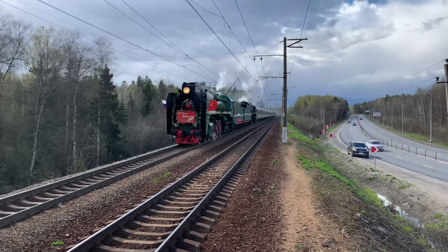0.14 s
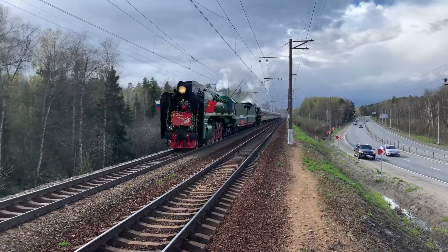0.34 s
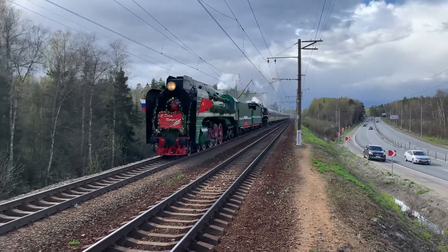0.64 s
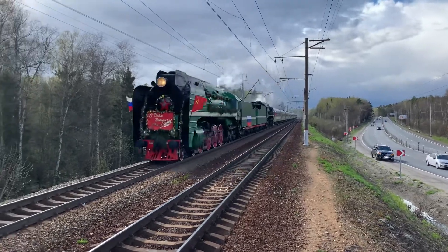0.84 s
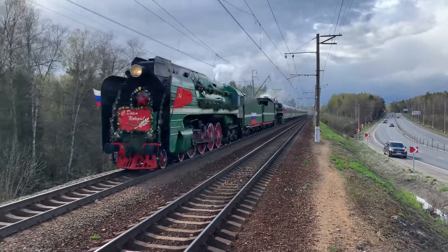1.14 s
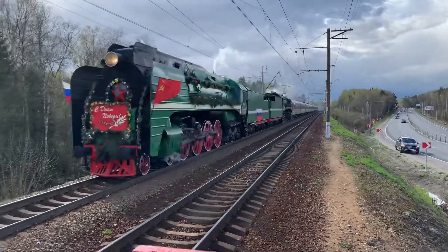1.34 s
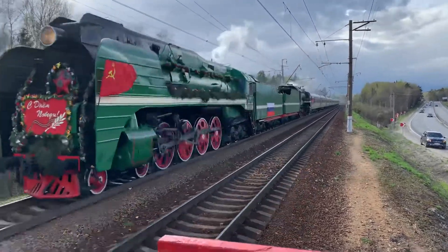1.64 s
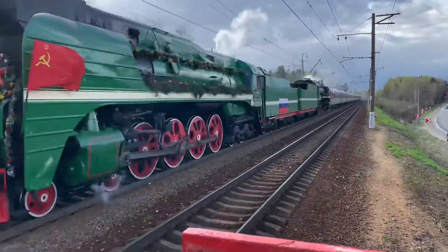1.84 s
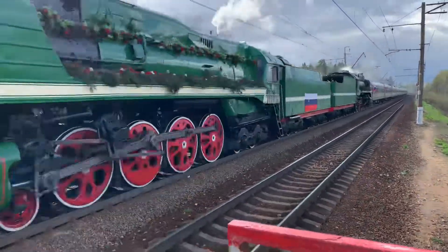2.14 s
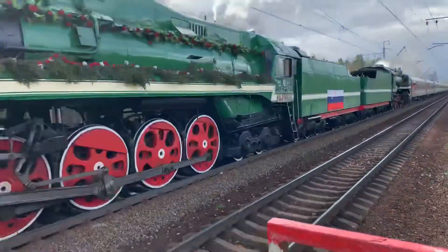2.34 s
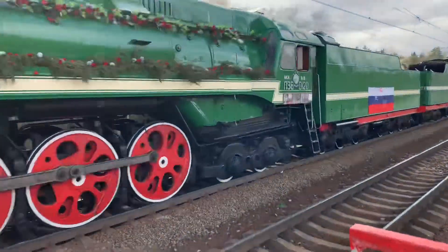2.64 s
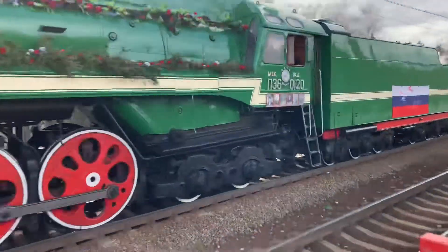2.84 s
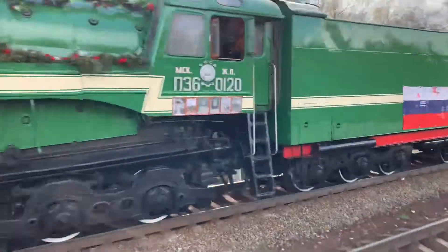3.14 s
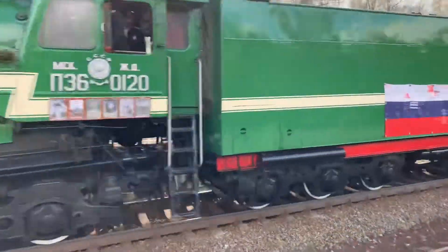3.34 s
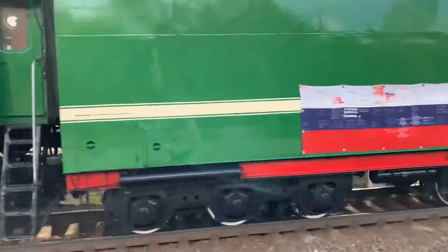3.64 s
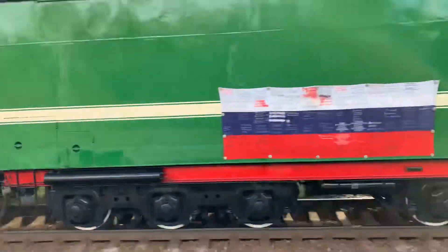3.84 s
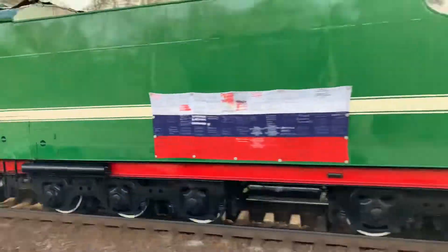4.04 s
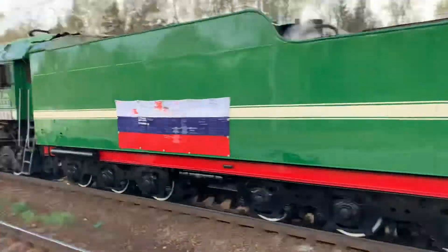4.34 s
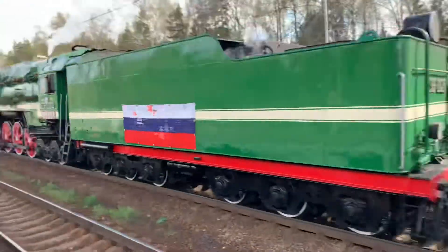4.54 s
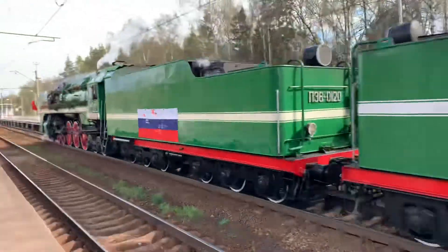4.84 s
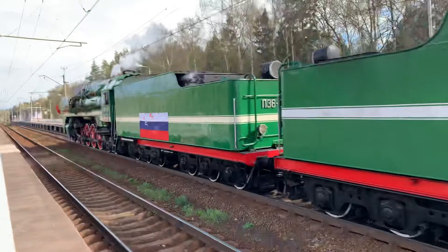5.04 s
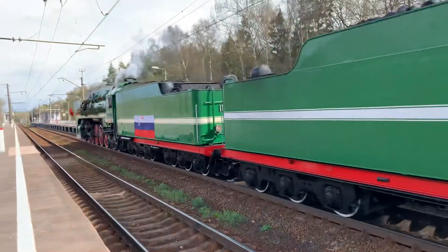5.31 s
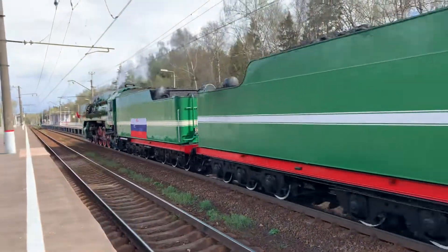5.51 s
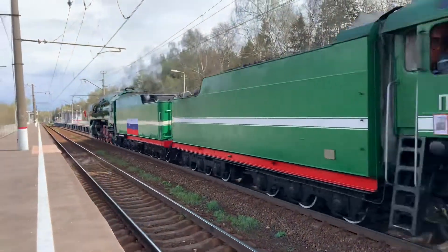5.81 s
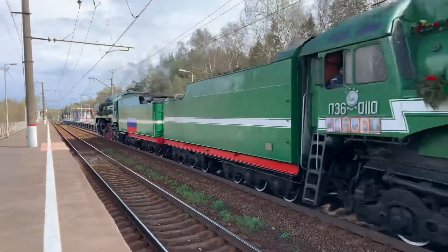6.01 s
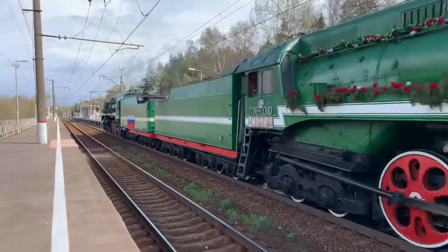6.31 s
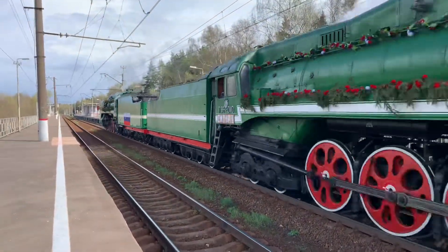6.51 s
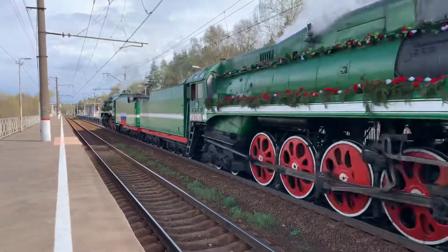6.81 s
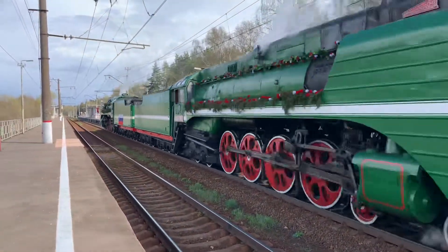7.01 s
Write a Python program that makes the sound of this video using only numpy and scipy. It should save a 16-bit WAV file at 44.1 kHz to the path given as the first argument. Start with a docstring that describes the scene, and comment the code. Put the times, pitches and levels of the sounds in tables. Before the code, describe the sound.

Two coupled steam locomotives pass at speed, close to a stereo microphone on a station platform. The rails sing faintly as a bright, sputtering steam hiss grows and sweeps to the side. The first engine goes by with roaring wheels, ragged rod clatter, dull thuds and a deep rumble. Another steam outlet gushes briefly, then the second engine follows with a softer rush as the hiss fades.

```python
"""Two steam locomotives passing a platform

Two coupled engines roll by at speed, close to a stereo microphone. A steam jet hisses from the first,
sweeping across the two ports, and the trees throw it back; a second outlet gushes by the tender, and
the next engine follows with a softer rush. Underneath, wheels roar on the rails group by group,
the running gear clatters and thuds, and the heavy frames rumble."""
import sys
import numpy as np
from scipy import signal
from scipy.fft import rfft, irfft
from scipy.io import wavfile
from scipy.ndimage import uniform_filter1d

SR = 44100
rng = np.random.default_rng(int(sys.argv[2]) if len(sys.argv) > 2 else 0)


def bounce(signal):
    """Save signal as a 16-bit WAV file at the path given by the first command-line argument."""
    frames = np.transpose(np.atleast_2d(signal))
    limited = np.clip(frames, -1, 1)
    pcm = np.round(limited * 32767).astype(np.int16)
    wavfile.write(sys.argv[1], SR, pcm)


N = 315932
T = np.arange(N) / SR
HZ = np.fft.rfftfreq(1024, 1 / SR)
FRAME_T = np.arange(N // 256 + 5) * 256 / SR
TRAIN_M_PER_S, SOUND_M_PER_S, TRACK_DISTANCE_M = 18, 343, 6.9

# The jet swells, holds alongside, sinks behind the tender. Each row: time in seconds, relative dB.
JET_LEVEL = [(0, -39), (0.2, -38.5), (0.32, -34), (0.7, -32.5), (0.9, -31.5), (1.7, -27), (2.2, -25),
             (3.05, -29), (4.2, -26), (4.32, -30.5), (5.15, -27.5), (5.75, -35.5), (6.1, -36),
             (7.16, -45.5)]
# The jet's direction. Each row: time in seconds, lead of the left port in ms.
JET_LEAD = [(0.0, 0.051), (0.7, 0.081), (1.2, 0.091), (1.65, 0.14), (1.85, 0.21), (2.1, 0.22), (2.35, 0.29),
            (2.6, 0.39), (3.2, 0.4), (3.8, 0.39), (4.1, 0.3), (4.4, 0.23), (4.75, 0.15), (5.4, 0.12),
            (7.1, 0.093)]
# How alike the ports hear steam, and wheels. Each row: frequency in Hz, likeness from 0 to 1.
JET_LIKENESS = [(1500, .82), (2600, .96), (6000, .92), (8500, .85), (10300, .8), (13000, .88)]
WHEEL_LIKENESS = [(100, 0.96), (380, 1), (550, 0.4), (900, 0.54), (2000, 1)]


def steam_jet(level_db=2.0, patchy_db=1.27, streak_db=2.06, flutter_db=0.75):
    """A turbulent jet: its roar and fizz shift as it turns past, and it sputters."""
    # The hiss's colour. Each row: frequency in Hz, relative level in dB.
    hiss_colour = [(700, -19), (1450, -8), (1750, -3), (2150, -1.5), (3000, .3), (4400, 2.7), (5200, .4),
                   (6100, 2), (7300, -3.2), (8300, -1.6), (10500, -4.6), (13000, -4.2), (14500, -8.5)]
    # The roar around 2 kHz, and the treble. Each row: time in seconds, lift in dB before band weighting.
    roar_ride = [(0, 4.5), (1.6, 2.5), (2.15, -2.5), (3.65, 3.5), (4.6, -2), (5.6, 5.5), (6.5, 1),
                 (7.16, 15.5)]
    treble_ride = [(0, -2.5), (0.8, -2), (1.7, 1), (1.82, 2), (1.95, 0.3), (3, 0.3), (4.3, -1.2), (5, -0.3),
                   (6.1, -1), (7.16, -5)]
    # Spurts of steam. Each row: centre in seconds, lift in dB, half length in seconds, extra roar in dB.
    spurts = [(0.95, 2.5, 0.19, -4.5), (1.39, 2, 0.021, -2), (1.566, 4.5, 0.0059, -8),
              (1.83, 3.5, 0.055, -2), (2.495, 3, 0.016, -2.5), (2.538, 6, 0.0079, -4),
              (2.602, 3, 0.025, -3), (2.915, 4.5, 0.011, 1), (3.288, 3.5, 0.018, 5.5),
              (3.477, 1, 0.052, 4.5), (3.747, 3.5, 0.041, 1), (3.895, 5.5, 0.036, -8),
              (4.016, 1.5, 0.0076, 11), (4.086, 7, 0.013, 4.5), (4.54, 0.5, .03, 4),
              (4.845, 4.5, 0.042, -2), (4.986, 0, 0.023, 5), (5.07, 0, 0.049, 2), (5.79, 5, 0.14, 3.5),
              (6.5, 6, 0.03, 0)]
    # The hiss dips briefly. Each row: centre in seconds, gain in dB, half length in seconds.
    dips = [(0.65, -1.5, .025), (1.32, -3, 0.023), (2.566, -5, 0.013), (3.633, -5.5, 0.012),
            (4.647, -3, 0.047)]
    roar_db = curve(roar_ride, FRAME_T)
    roar_db += sum(db * swell(FRAME_T, s, length) for s, _, length, db in spurts)
    roar = roar_db[:, None] * spectrum([(1500, 1.0), (3200, 0.47), (5200, 0)])
    fizz = curve(treble_ride, FRAME_T)[:, None] * spectrum([(6500, 0.028), (9500, 1.2), (13000, 4.2)])
    eddies = patchy_db * patches(size=(5, 24)) + streak_db * patches(size=(22, 4))
    jet = noise(spectrum(hiss_colour) + roar + fizz + eddies, JET_LIKENESS, jet_phase(), jet_focus())
    spurts_db = sum(db * swell(T, s, length) for s, db, length, _ in spurts)
    dips_db = sum(db * swell(T, s, length) for s, db, length in dips)
    sputter_db = flutter_db * flutter(slow_hz=7, fast_hz=160)
    return jet * gain_of(level_db + curve(JET_LEVEL, T) + spurts_db + dips_db + sputter_db)


def jet_phase(wander_ms=0.013, centred_above_hz=10100):
    """The jet's phase between the ports: its direction wavers, and ballast scatter roughens the sweep."""
    # The ports' own phase, and what sound from the side adds.
    # Each row: frequency in Hz, lead of the left in radians.
    port_phase = [(1500.0, -1.0), (2200.0, -0.52), (3000.0, -0.27), (4300.0, 1.52), (5100.0, 0.73),
                  (5800.0, 2), (6500.0, 4), (7200.0, 5.5), (8000.0, 6.1), (9000.0, 7.5), (10400.0, 10),
                  (11000.0, 15.5)]
    side_phase = [(1700.0, 0.93), (2600.0, 0.38), (3500.0, 0.55), (5000.0, 0.88), (5900.0, 1),
                  (6900.0, -1.7), (8000.0, 0.052), (10000.0, -2.2)]
    wander = wander_ms * np.interp(FRAME_T, T, flutter(slow_hz=3.7, fast_hz=40))
    scatter = 0.4 * patches(size=(30, 12))
    ports = spectrum(port_phase) + sideways(FRAME_T)[:, None] * spectrum(side_phase)
    sweep = arrival_phase(np.c_[FRAME_T, curve(JET_LEAD, FRAME_T) + wander])
    return (sweep + ports + scatter) * (HZ < centred_above_hz)


def jet_focus():
    """While its direction swings quickly the plume is wide, and the ports hear it less alike."""
    swing_ms_per_s = abs(uniform_filter1d(np.gradient(curve(JET_LEAD, FRAME_T), FRAME_T), size=60))
    return 1 - .35 * np.minimum(swing_ms_per_s[:, None] / .25, 1)


def sideways(t):
    """How far the jet is off to the side: zero straight along the track, one abreast."""
    return (curve(JET_LEAD, t) / max(ms for _, ms in JET_LEAD)) ** 2


def gush(level_db=-28.0, start_s=3.93, end_s=4.19, lead_ms=0.345):
    """A second, narrower steam outlet swings into view by the tender and is cut off again."""
    # The outlet's peaky colour. Each row: frequency in Hz, relative level in dB.
    colour = [(1200, -14), (2200, -7), (2900, 8), (3900, -12), (5000, -23), (6100, 8), (7200, -11),
              (9000, 2), (12000, -27)]
    envelope = bursts([(start_s, level_db, end_s - start_s)], rise_s=0.14, decay_s=0.055)
    return noise(spectrum(colour), JET_LIKENESS, arrival_phase([(0, lead_ms)])) * envelope


def second_steam(level_db=-36, abreast_s=6.47, patchy_db=3.3, flutter_db=-1.2):
    """The second locomotive brings a softer, broad rush of steam of its own."""
    # The rush's colour. Each row: frequency in Hz, relative level in dB.
    colour = [(900, -8), (1600, 1.5), (2900, 1), (4200, 3), (6000, -1.5), (8500, -6), (11000, -16),
              (14000, -17)]
    rush = noise(spectrum(colour) + patchy_db * patches(size=(5, 24)), JET_LIKENESS, jet_phase())
    sputter_db = flutter_db * flutter(slow_hz=7, fast_hz=160)
    return rush * nearness(abreast_s) * gain_of(level_db + sputter_db)


def wheels(rails_db=-41, ring_db=3.0, flutter_db=1.0):
    """Rolling noise: first the rails sing ahead of the train, then the wheels themselves take over."""
    # Singing rails, and wheels close by. Each row: frequency in Hz, relative level in dB.
    rail_colour = [(250, -16), (500, -5.5), (700, -4), (880, -2), (1080, 2), (1350, -7), (1900, -47),
                   (2250, -3), (2600, -17.5), (4000, 2), (8000, -16)]
    wheel_colour = [(250, -3), (470, -3.5), (570, -5), (670, -3), (820, -4), (1100, -3.5), (1450, -8),
                    (2000, -17.5), (3500, -18.5), (8000, -40)]
    # The wheels' direction. Each row: time in seconds, lead of the left port in ms.
    lead = [(0, 0.022), (2.4, 0.17), (3.7, 0.25), (4.4, -0.22), (7.1, -0.25)]
    # Drivers and bogies going by. Each row: time abreast in seconds, level in dB.
    groups = [(2.5, -29.5), (3.4, -33.5), (4.75, -36), (5.75, -42), (6.5, -37.5)]
    colour = blend(rail_colour, wheel_colour, start_s=1.1, end_s=2.3)
    roar = noise(colour + ring_db * patches(size=(30, 2)), WHEEL_LIKENESS, arrival_phase(lead))
    rails = gain_of(rails_db) * train_gain(arrive_s=0.77, steepness=2.9, ramp_s=4.3, db_per_s=2)
    power = rails ** 2 + sum((gain_of(db) * nearness(s)) ** 2 for s, db in groups)
    roughness_db = flutter_db * flutter(slow_hz=6, fast_hz=70)
    return roar * np.sqrt(power) * gain_of(roughness_db)


def rod_clatter(level_db=-4, rattle_db=1.0):
    """Loose rods and driving wheels rattle in short, ragged bursts."""
    # The bursts. Each row: start in seconds, relative level in dB, length in seconds.
    hits = [(1.447, -33.5, 0.029), (1.857, -27, 0.015), (2.273, -22.5, 0.03), (2.475, -33, 0.019),
            (2.7, -21, 0.039), (2.875, -23, 0.045), (3.152, -24.5, 0.029), (3.58, -32, 0.048),
            (4.365, -32, 0.009), (5.385, -37.5, 0.0089), (5.78, -35, 0.013), (6.06, -45, 0.011),
            (6.228, -30, 0.0075), (6.335, -37, 0.014), (6.65, -35.5, 0.023)]
    # The clatter's colour. Each row: frequency in Hz, relative level in dB.
    colour = [(60, -24.5), (130, -7), (300, 6.5), (700, 11.5), (950, 4.5), (1350, 6), (1750, -7),
              (4000, -14), (9000, -32)]
    rattle = gain_of(rattle_db * flutter(slow_hz=60, fast_hz=250))
    envelope = gain_of(level_db) * bursts(hits, rise_s=0.0015, decay_s=0.02)
    return noise(spectrum(colour), WHEEL_LIKENESS) * rattle * envelope


def thuds(level_db=1.0, rise_s=0.0032):
    """Heavy blows: after each, the track bed swings briefly and is still."""
    # Dull thuds. Each row: start in seconds, relative level in dB, pitch in Hz.
    blows = [(.018, -33, 188), (0.048, -32, 89), (0.079, -31, 208), (.097, -26.5, 110), (0.564, -28, 60.4),
             (2.266, -26, 127), (2.424, -21.5, 99.4), (2.453, -21, 150), (2.715, -16, 91),
             (2.863, -17.5, 95), (3.162, -18.5, 110), (3.232, -18, 70), (3.451, -18.5, 91),
             (3.84, -27.5, 84), (4.219, -19, 81), (4.546, -21.5, 70.4), (4.746, -20, 90),
             (5.229, -25, 93.5), (5.782, -18, 85), (6.077, -30, 129), (6.153, -23, 80), (6.23, -23, 95),
             (6.377, -19.5, 100), (6.534, -27, 120), (6.703, -33, 100), (6.837, -21.5, 101)]
    track_bed = np.zeros(N)
    for start_s, db, hz in blows:
        age = np.maximum(T - start_s, 0)
        envelope = age / rise_s * np.exp(1 - age / rise_s)
        track_bed += gain_of(level_db + db) * envelope * np.sin(2 * np.pi * hz * age)
    return track_bed


def rumble(deep_db=-32.0, far_db=-50.5, drone_db=-30.5, lead_ms=-0.22, ring_db=1.5, jolt_db=0.5):
    """The track bed shakes under the axles; frames and tenders drone above it; both jolt together."""
    # The track bed, then the drone coming and going by. Each row: frequency in Hz, relative level in dB.
    deep_colour = [(20, -32), (40, 1), (52, -4.5), (80, -2), (125, -3.5), (170, -13.5), (260, -14.5),
                   (600, -76)]
    drone_coming = [(70, -53), (150, 7.5), (200, 0), (270, 1.5), (350, -1.5), (420, -12.5), (490, -9.5),
                    (800, -20.5), (2500, -60)]
    drone_passing = [(70, -14), (150, -6.5), (205, -1.5), (250, -1.5), (305, -1), (375, 4.5), (440, -14),
                     (520, -10), (640, -20), (800, -36), (2500, -46)]
    phase = arrival_phase([(0, lead_ms)])
    deep = noise(spectrum(deep_colour), WHEEL_LIKENESS, phase)
    shaking = gain_of(deep_db) * train_gain(arrive_s=1.4, steepness=1.53, ramp_s=2.3, db_per_s=-1.1)
    deep *= np.hypot(gain_of(far_db), shaking)
    drone_colour = blend(drone_coming, drone_passing, start_s=1.8, end_s=2.96)
    drone = noise(drone_colour + ring_db * patches(size=(16, 2)), WHEEL_LIKENESS, phase)
    drone *= gain_of(drone_db) * train_gain(arrive_s=2.13, steepness=1.37, ramp_s=5.4, db_per_s=-5.0)
    return (deep + drone) * gain_of(jolt_db * flutter(slow_hz=8.7, fast_hz=30))


def wheel_ring(level_db=-39.0, rest_hz=1650, width_hz=110, abreast_s=3.43):
    """Rail roughness keeps one broad mode of a wheel disc sounding; its pitch drops as it goes by."""
    along_m = position_m(abreast_s, FRAME_T)
    receding_m_per_s = TRAIN_M_PER_S * along_m / np.hypot(along_m, TRACK_DISTANCE_M)
    doppler_hz = rest_hz / (1 + receding_m_per_s / SOUND_M_PER_S)
    detune = (HZ - doppler_hz[:, None]) / width_hz
    ring = noise(-20 * np.log10(1 + detune ** 2), JET_LIKENESS, jet_phase())
    return ring * gain_of(level_db) * nearness(abreast_s)


def steam_echo(level_db=-39, follow=0.95, delay_s=0.034):
    """Trees and platform throw back a diffuse wash of hiss that follows the jet late and loosely."""
    # The wash's colour. Each row: frequency in Hz, relative level in dB.
    colour = [(1000, -28), (2000, -4), (3200, 1), (4500, 16.5), (6200, 11), (8500, 4.5), (10500, 18),
              (13000, -34), (14800, -26)]
    # Its wide image. Each row: frequency in Hz, left-right likeness from 0 to 1.
    likeness = [(1000, .2), (12000, 0)]
    jet_db = curve(JET_LEVEL, T - delay_s)
    return noise(spectrum(colour), likeness) * gain_of(level_db + follow * (jet_db - jet_db.max()))


def sizzle(level_db=-59):
    """Small leaks all along the train keep up a faint, high fizz."""
    colour = spectrum([(6000, -30), (10000, -2), (13000, 0), (14800, -7)])
    return noise(colour, likeness=[(6000, .6)]) * gain_of(level_db)


def position_m(abreast_s, t):
    """How far along the track a part of the train is past the listener."""
    return TRAIN_M_PER_S * (t - abreast_s)


def nearness(abreast_s):
    """Amplitude of a passing point source, one when abreast."""
    return TRACK_DISTANCE_M / np.hypot(TRACK_DISTANCE_M, position_m(abreast_s, T))


def train_gain(arrive_s, steepness, ramp_s, db_per_s):
    """A long source grows with the angle that it fills; from ramp_s on it also ramps up or down."""
    filled = .5 + np.arctan(position_m(arrive_s, T) / TRACK_DISTANCE_M) / np.pi
    return filled ** (steepness / 2) * gain_of(db_per_s * np.maximum(T - ramp_s, 0))


def arrival_phase(lead):
    """Phase by which the left port leads, from (seconds, ms) rows: frames x bins."""
    return 2 * np.pi * HZ * curve(lead, FRAME_T)[:, None] / 1000


def noise(colour_db, likeness, phase=0, focus=1):
    """Stereo noise of rms one with a given colour, likeness and phase; a low focus widens it."""
    left_re, left_im, apart_re, apart_im = rng.standard_normal((4, len(FRAME_T), len(HZ)))
    left, apart = left_re + 1j * left_im, apart_re + 1j * apart_im
    same = np.clip(spectrum(likeness) * focus, 0, 1)
    right = (same * left + np.sqrt(1 - same ** 2) * apart) * np.exp(-1j * phase)
    frames = np.array([left, right]) * gain_of(colour_db)
    _, stereo = signal.istft(frames, nperseg=1024, noverlap=768, time_axis=1, freq_axis=2)
    return unit_rms(stereo[:, :N])


def flutter(slow_hz, fast_hz):
    """Turbulent wobble with equal power in each octave between two rates."""
    hz = np.fft.rfftfreq(N, 1 / SR) + 1e-3
    shape = 1 / np.sqrt(hz * (1 + (slow_hz / hz) ** 4) * (1 + (hz / fast_hz) ** 4))
    return unit_rms(irfft(rfft(rng.standard_normal(N)) * shape, N))


def patches(size):
    """Random blotches of the given (frames, bins) extent."""
    field = rng.standard_normal((len(FRAME_T), len(HZ)))
    return unit_rms(uniform_filter1d(uniform_filter1d(field, size[0], axis=0), size[1], axis=1))


def bursts(rows, rise_s, decay_s):
    """Envelope of bursts that rise, last a moment and die away."""
    envelope = np.zeros(N)
    for start_s, db, length_s in rows:
        attack = np.clip((T - start_s) / rise_s, 0, 1)
        release = np.exp(-np.maximum(T - start_s - length_s, 0) / decay_s)
        envelope += gain_of(db) * attack * release
    return envelope


def swell(t, centre_s, half_length_s):
    """A smooth bump of height one."""
    return np.exp(-((t - centre_s) / half_length_s) ** 2)


def blend(first, second, start_s, end_s):
    """One spectrum turns into another between two times: frames x bins, dB."""
    share = np.clip((FRAME_T[:, None] - start_s) / (end_s - start_s), 0, 1)
    return (1 - share) * spectrum(first) + share * spectrum(second)


def spectrum(points, hz=HZ):
    """Reads (Hz, value) points along a log-frequency axis."""
    point_hz, values = np.transpose(points)
    return np.interp(np.log(hz + 1), np.log(point_hz + 1), values)


def curve(points, at):
    """Reads two-column points along straight lines."""
    return np.interp(at, *np.transpose(points))


def gain_of(db):
    """Decibels to amplitude."""
    return 10 ** (np.asarray(db) / 20)


def unit_rms(x):
    """Scales to an rms of one."""
    return x / np.sqrt(np.mean(x ** 2) + 1e-20)


def scene():
    """Everything that reaches the two ports."""
    steam = steam_jet() + gush() + second_steam() + sizzle() + steam_echo()
    return steam + wheels() + wheel_ring() + rumble() + rod_clatter() + thuds()


def record(dry):
    """The microphone: treble peaks that shift with direction, strong on the right; then band limits."""
    # The right port's peak, what sound from the side adds to it, and the left port's mild peak for
    # sound from along the track. Each row: frequency in Hz, gain in dB at full strength.
    right_lift = [(300, -.4), (900, .8), (1400, .1), (2000, .8), (6200, 1.2), (7900, 2), (8050, 11),
                  (8800, 13), (9500, 8), (10100, 1), (11000, 0)]
    side_lift = [(9000, 0), (9700, 10), (10100, 8.5), (10800, 6.5), (11150, -52), (11900, 0), (14000, -5)]
    left_lift = [(3800, 0), (5000, -1), (7000, 1), (7800, -1), (8300, 0), (9800, 6.5), (11000, -3.5)]
    # The right peak by direction. Each row: lead of the left port in ms, strength as a factor.
    lift_by_lead = [(.07, 1.65), (.12, 1.55), (.245, 0.61), (.34, .8), (.43, 1.21)]
    low_cut_hz, high_cut_hz = 42.4, 14750
    hz, side = np.fft.rfftfreq(N, 1 / SR), sideways(T)
    lifted = rfft(dry[1]) * gain_of(spectrum(right_lift, hz))
    right_ahead = irfft(lifted, N)
    right_beside = irfft(lifted * gain_of(spectrum(side_lift, hz)), N)
    peaked = right_ahead + side * (right_beside - right_ahead)
    strength = curve(lift_by_lead, curve(JET_LEAD, T))
    right = dry[1] + strength * (peaked - dry[1])
    left_ahead = irfft(rfft(dry[0]) * gain_of(spectrum(left_lift, hz)), N)
    left = side * dry[0] + (1 - side) * left_ahead
    low_cut = signal.butter(8, low_cut_hz, "highpass", fs=SR, output="sos")
    high_cut = signal.firwin(511, high_cut_hz, window=("kaiser", 9), fs=SR)
    return signal.oaconvolve(signal.sosfilt(low_cut, [left, right]), high_cut[None], "same", axes=1)


dry = scene()
out = record(dry)
bounce(out)
```